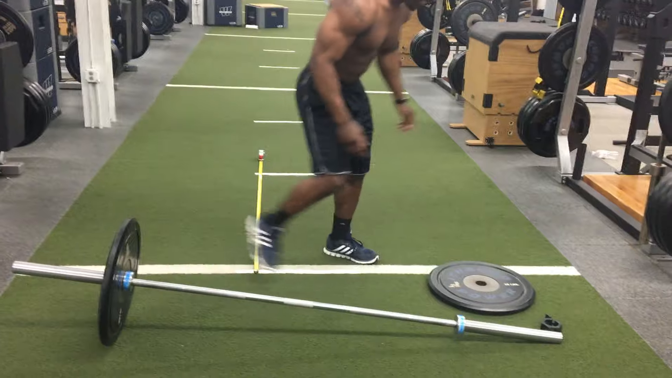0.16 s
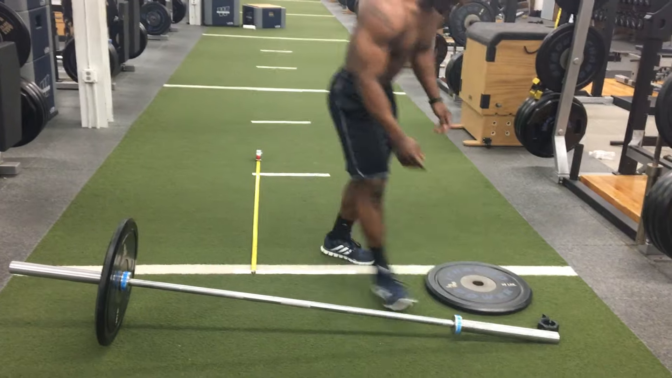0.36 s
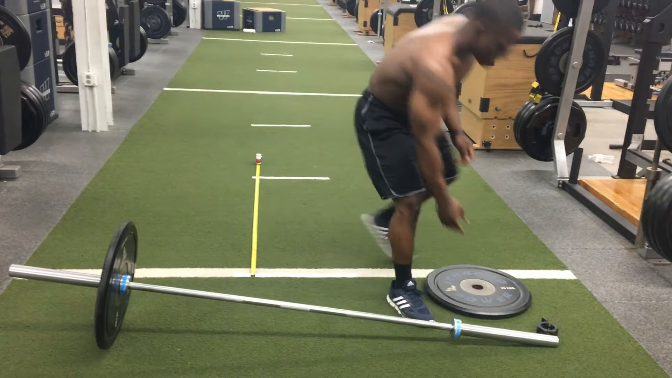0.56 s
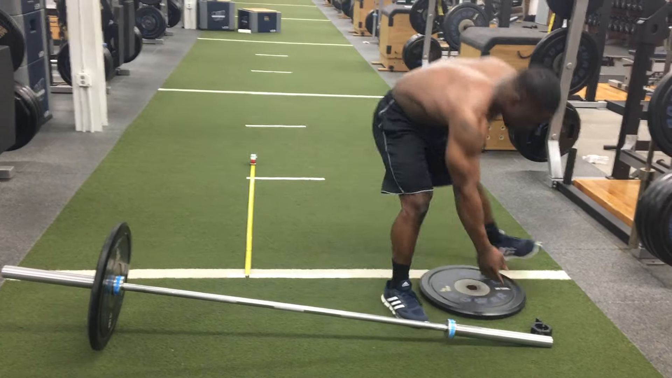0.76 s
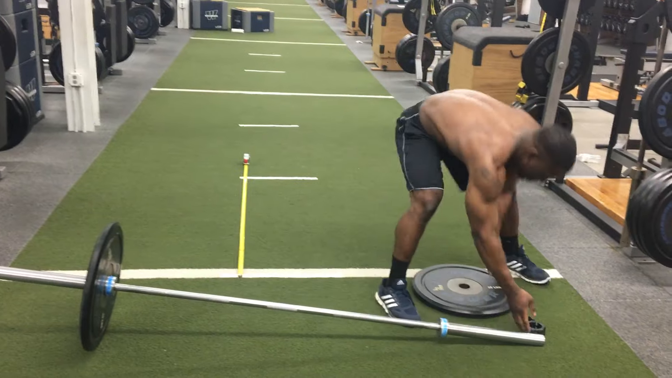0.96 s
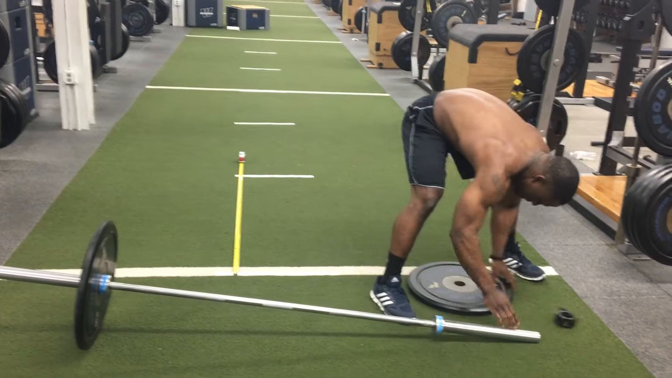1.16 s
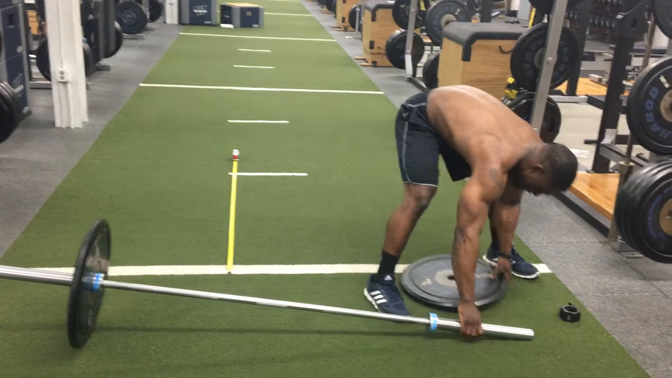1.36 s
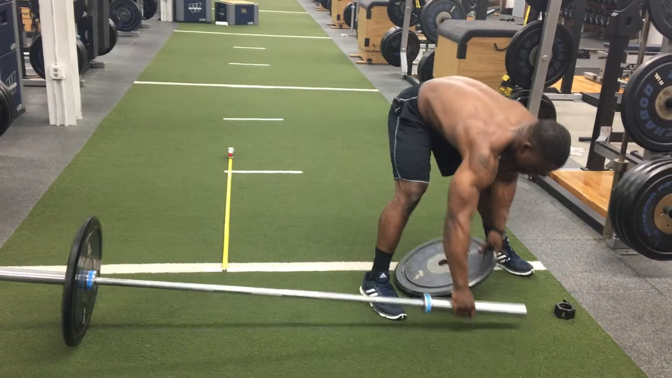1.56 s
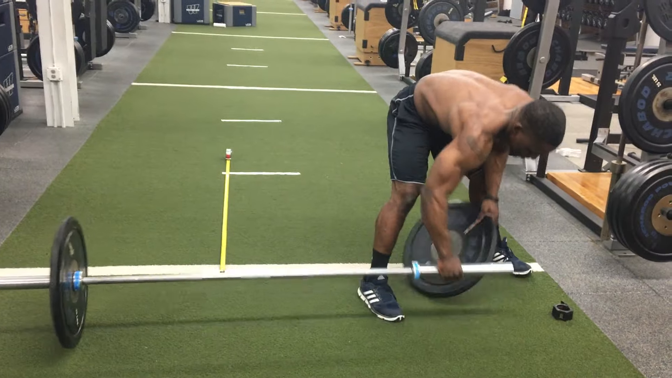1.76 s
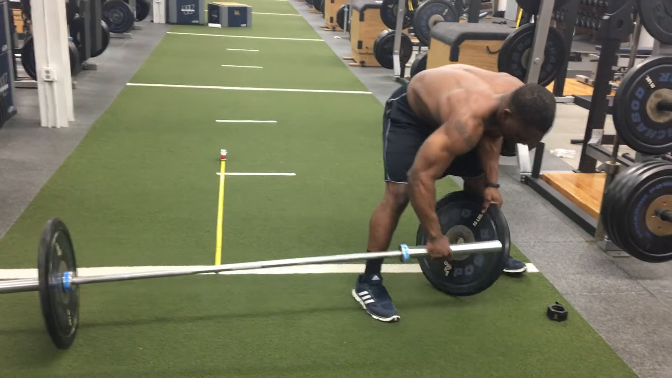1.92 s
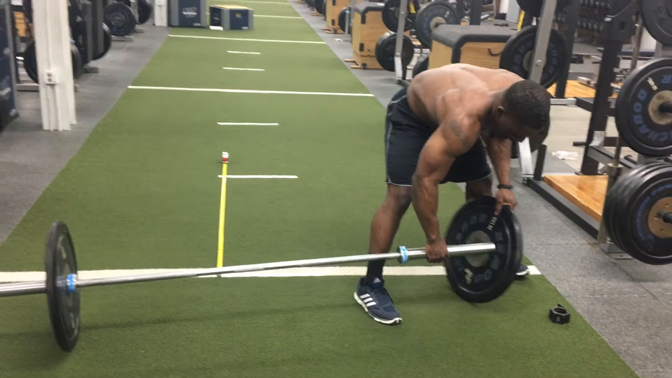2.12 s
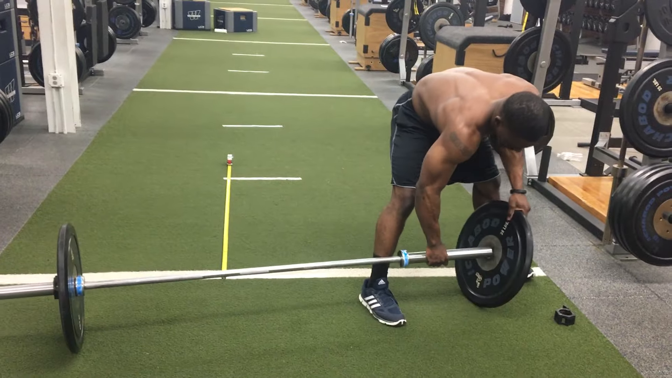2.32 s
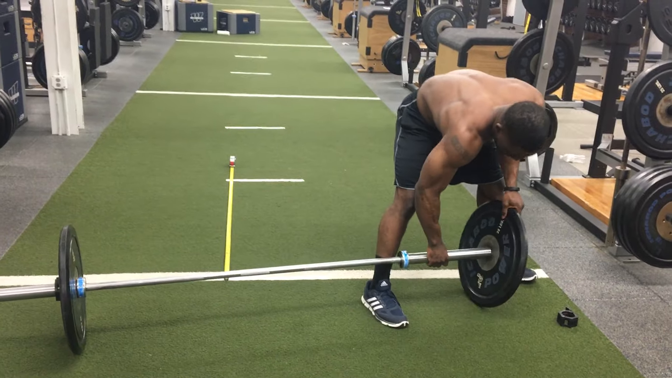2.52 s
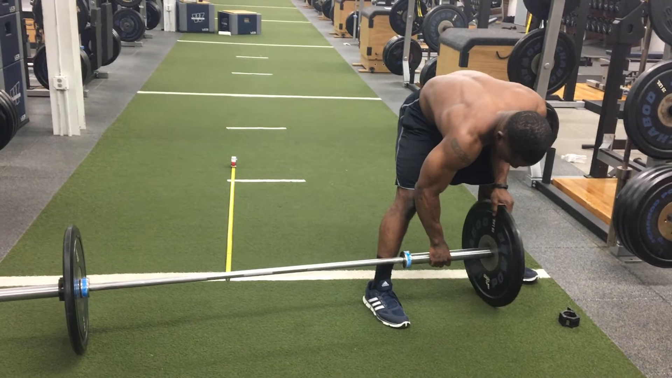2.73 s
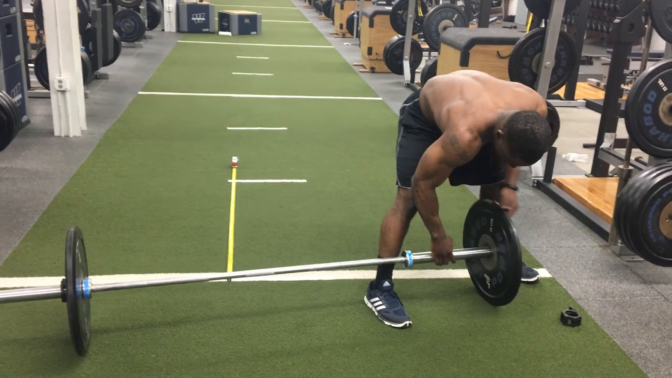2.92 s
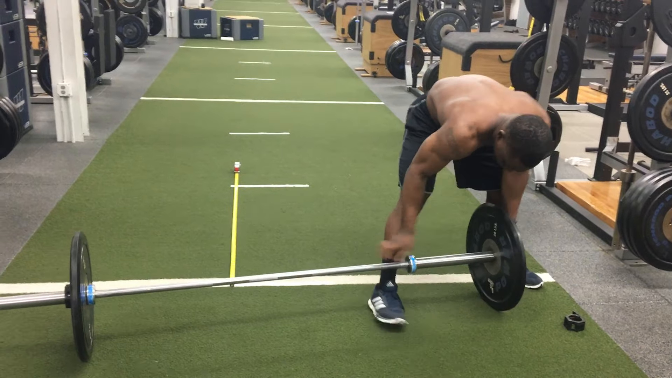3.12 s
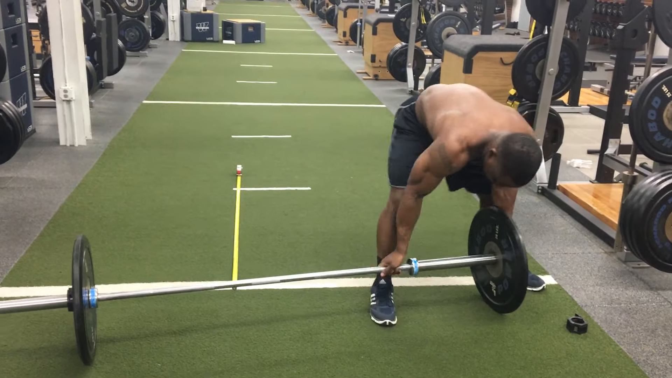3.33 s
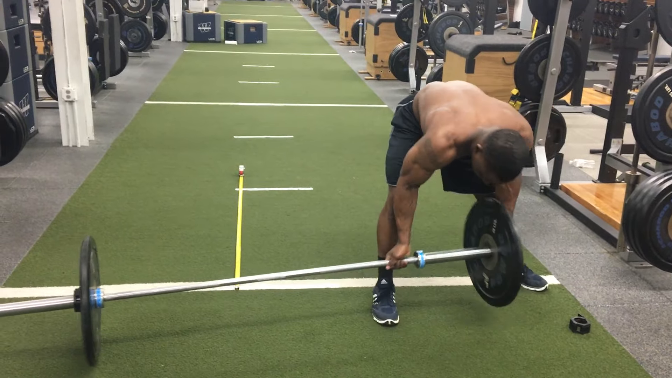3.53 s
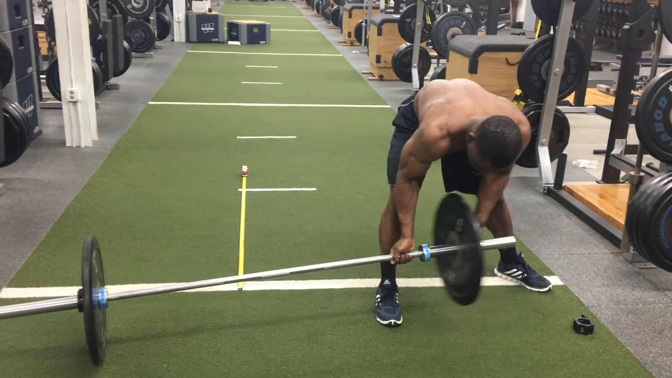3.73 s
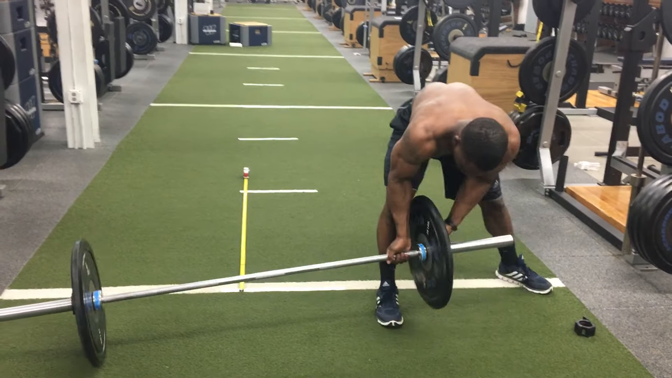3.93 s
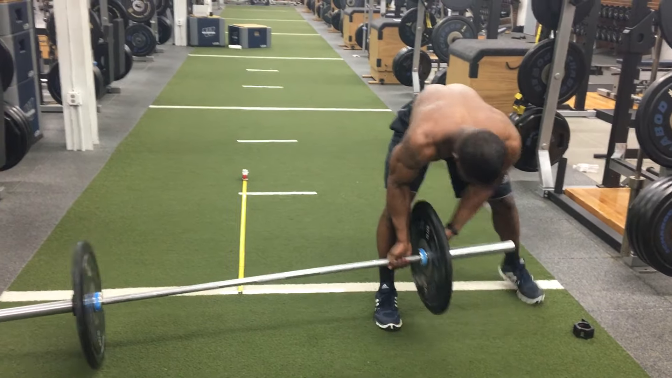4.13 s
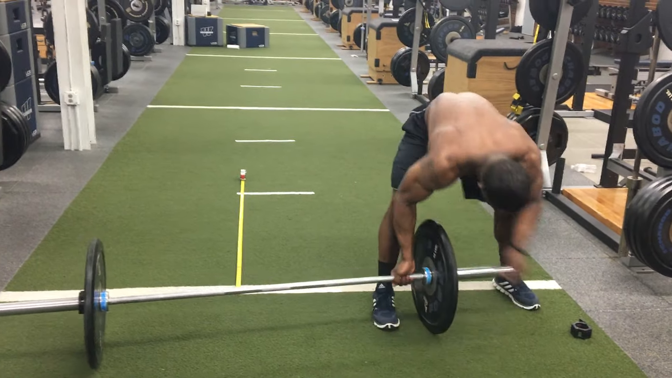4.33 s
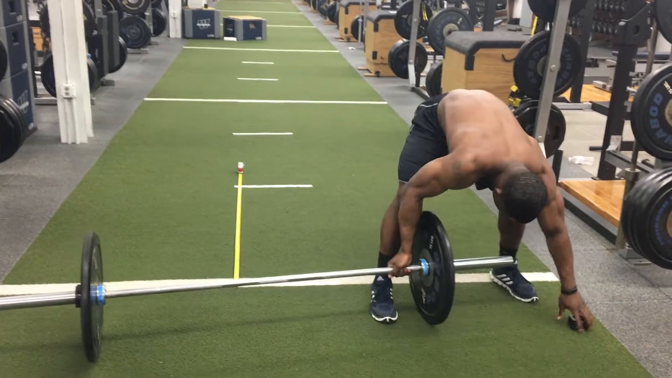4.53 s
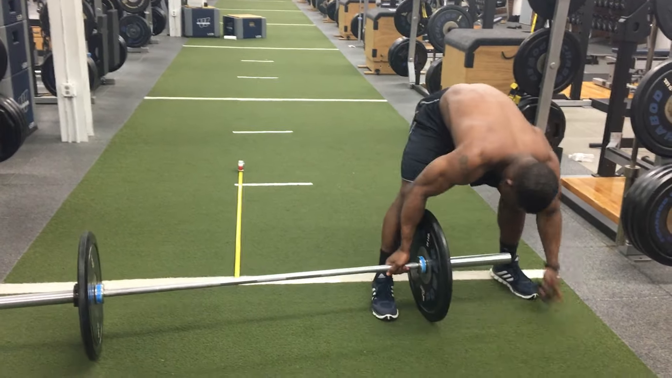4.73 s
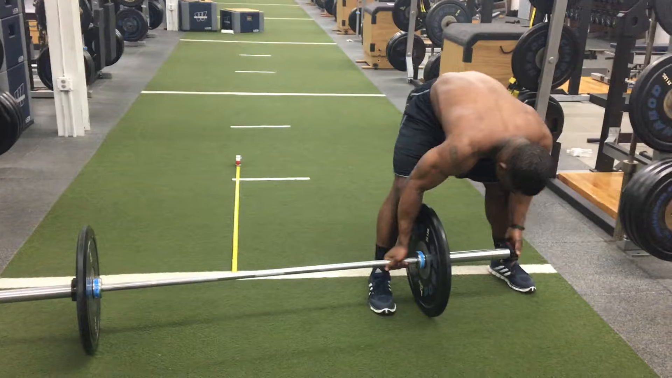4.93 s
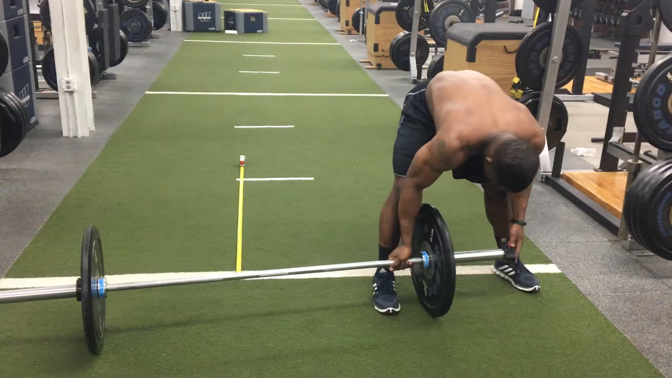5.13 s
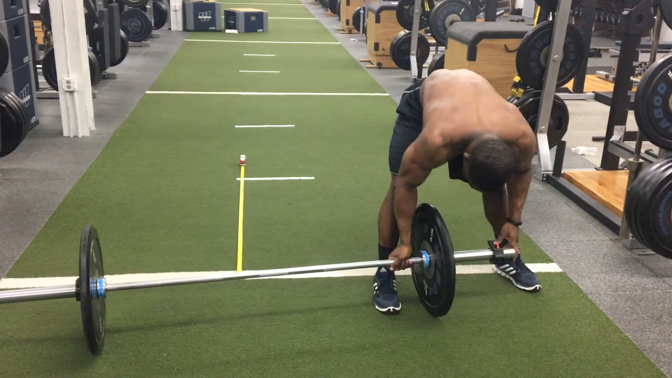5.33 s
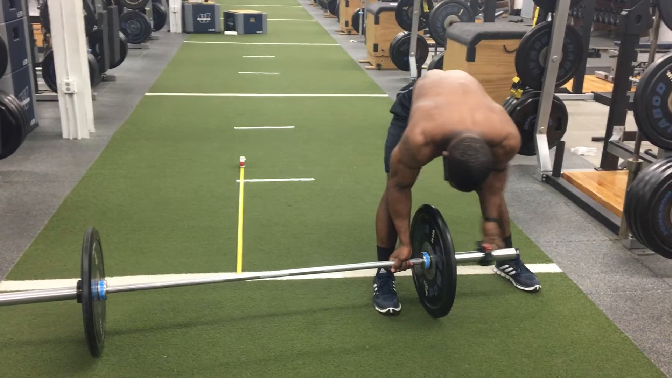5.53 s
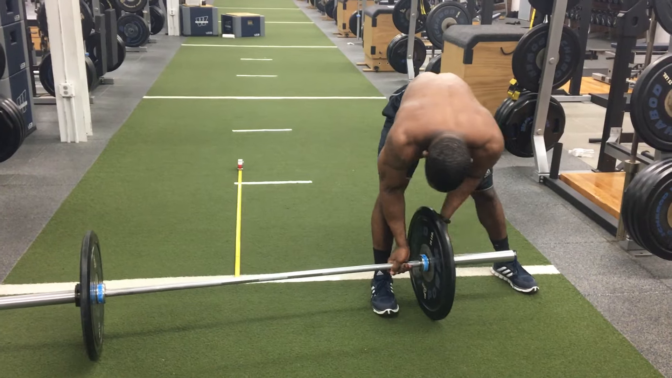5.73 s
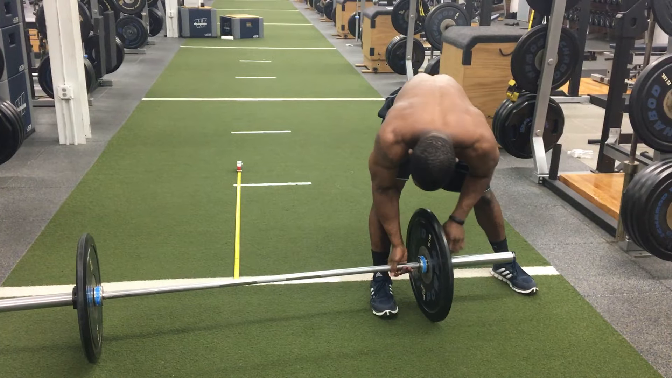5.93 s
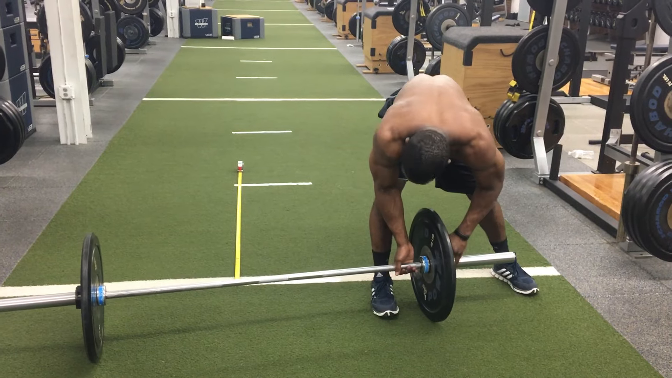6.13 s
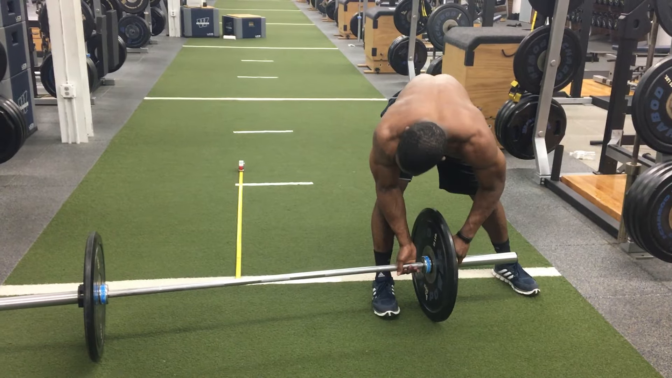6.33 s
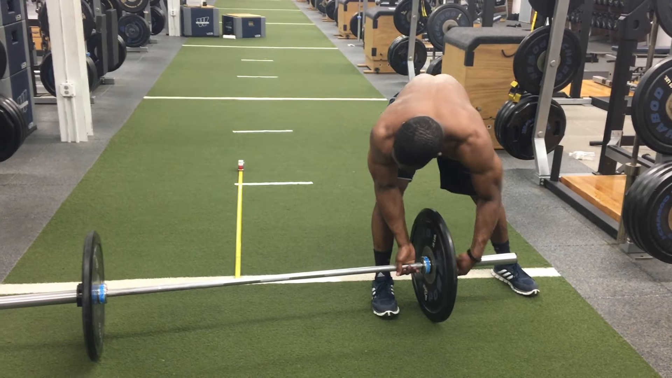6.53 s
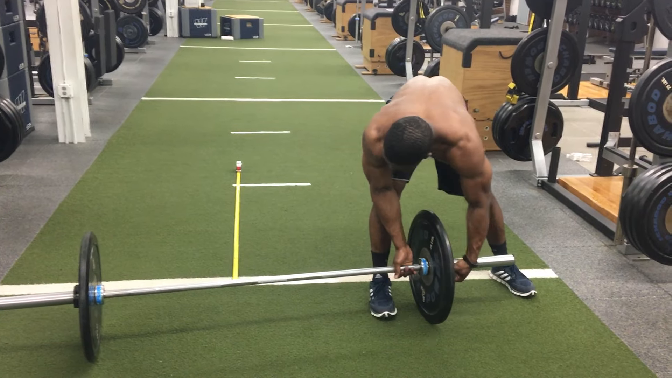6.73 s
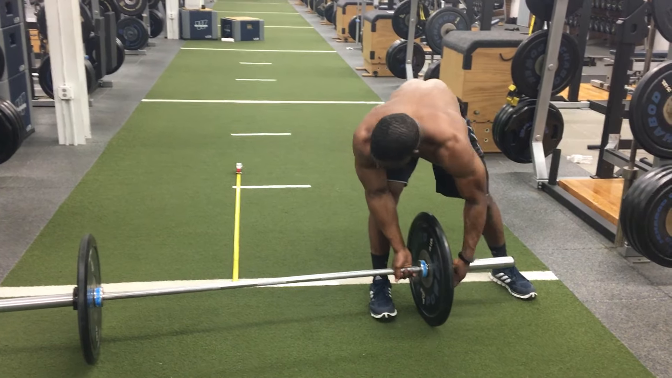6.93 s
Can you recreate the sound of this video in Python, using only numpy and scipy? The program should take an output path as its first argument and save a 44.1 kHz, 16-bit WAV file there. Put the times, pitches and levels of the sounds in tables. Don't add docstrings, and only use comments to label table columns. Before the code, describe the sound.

A steady low rush of ventilation with a faint electrical hum fills a large, hard gym hall. For the first two seconds there are only barely audible shoe ticks and grainy rustles on turf. At about 2.3 and 2.45 s a plate's hub knocks the steel sleeve tip: sharp clanks, brief ringing, dull rubber thump, with softer knocks from 2.75 to 2.95. A faint scuff comes at 3.2. At 3.54 the hub catches and scrapes, with small snags, a high chirp near 3.68 and a thin squeal, until the plate slams home at 3.95, by far the loudest hit, bouncing with a squeak at 4.04 and echoing through the hall. It rocks softly around 4.45. A plastic collar rattles from 5.0 to 5.4, whistles upward at 5.65 and snaps hard at 5.78. Faint ticks surround 6.0-6.2; a dry double lever click ends it at 6.86. Phone microphone, slightly overloaded at the slam.

```python
import sys
import numpy as np
from scipy import signal
from scipy.fft import rfft, irfft, next_fast_len
from scipy.io import wavfile
from scipy.ndimage import uniform_filter1d

SR = 44100
rng = np.random.default_rng(int(sys.argv[2]) if len(sys.argv) > 2 else 0)


def unload_audio(sound):
    columns = np.transpose(np.atleast_2d(sound))
    steps = np.round(np.clip(columns, -1, 1) * 32767)
    wavfile.write(sys.argv[1], SR, steps.astype(np.int16))


def boost(x):
    u = np.asarray(x, float) / 20
    return 10 ** u


N = 311434

# mode_hz [Hz], level_db [dB], t60_s [s to fall 60 dB]
TIP_MODES = [(1297, -10, .2), (1976, -6, .25), (2471, -7, .3), (2724, -5, .3), (2907, 0, .35),
             (3537, -7, .25), (3908, -6, .16), (4350, -6, .16), (5200, 0, .4), (5642, -8, .12),
             (6115, -7, .18), (6589, -5, .16), (7106, -8, .2), (7617, -6, .22), (8145, -9, .15),
             (8646, -8, .12), (9932, -12, .2), (12040, -12, .13), (13060, -10, .13)]
# mode_hz [Hz], level_db [dB], t60_s [s]
SHOULDER_MODES = [(950, -6, 0.07), (1328, 3.5, 0.1), (1697, 0.5, .12), (1885, -12, .12), (2017, -14, 0.16),
                  (2223, -11.5, 0.33), (2420, -23, .2), (2890, 3, 0.14), (3050, 1, .3), (3570, -11, 0.13),
                  (4290, -4, 0.14), (5280, -3.5, 0.23), (6140, -3.5, 0.21), (6627, -9, 0.1),
                  (7720, 5, 0.13), (7300, -5, 0.1), (8600, -5, 0.09), (10130, -3, 0.1), (11900, -10, .1),
                  (13100, -10, .1), (14090, -12, .1), (15300, -16, .08)]
# mode_hz [Hz], level_db [dB], t60_s [s]
RUBBER_MODES = [(110, -15, .09), (168, -5, .13), (200, 1, .18), (240, 0, .15), (270, -4, .1),
                (339, -4, .08), (418, -5, .07), (452, -8, .06), (560, -5, .05), (650, -4, .05),
                (950, -10, .04)]

TIP_BLOW = dict(thud_db=-32.5, thud_per_db=.47, thud_per_octave=-4,
                contact_ms=.8, softer_ms=.27, contact_max_ms=4.5)
SHOULDER_BLOW = dict(thud_db=-36.5, thud_per_db=.99, thud_per_octave=-.82,
                     contact_ms=4.3, softer_ms=.03, contact_max_ms=5.5)


def evened(x):
    return x / np.sqrt(np.mean(x ** 2) + 1e-20)


def read(points, hz):
    f, value = np.transpose(points)
    return np.interp(np.log(hz + 1), np.log(f + 1), value)


def add(mix, s, sound):
    part = mix[round(s * SR):][:len(sound)]
    part += sound[:len(part)]


def band(x, edges_hz):
    return signal.sosfilt(signal.butter(2, edges_hz, "band", fs=SR, output="sos"), x)


def wander(rate_hz):
    size = next_fast_len(N)
    hz = np.fft.rfftfreq(size, 1 / SR)
    drift = irfft(rfft(rng.standard_normal(size)) / (1 + (hz / rate_hz) ** 4), size)
    return evened(drift[:N])


def crack(db, hz, ms, below, above):
    size, kept = 4096, 1500
    f = np.fft.rfftfreq(size, 1 / SR)
    octaves = np.log2((f + 50) / hz)
    width = np.where(octaves < 0, below, above)
    colour = 1 / (1 + (octaves / width) ** 2) ** 2
    a, b = uniform_filter1d(rng.standard_normal((2, len(f))), size=14, axis=1)
    late_s = (evened(a) ** 2 + evened(b) ** 2) * max(ms, .2) / 2500
    phase = 2 * np.pi * np.cumsum(late_s + 0.000273) * f[1]
    burst = irfft(colour * np.exp(-1j * phase))[:kept]
    burst *= np.minimum(np.arange(kept) / 12, 1) * np.hanning(2 * kept)[kept:]
    return boost(db + 20.5) * burst / np.linalg.norm(burst)


def ring(modes, db, reach_hz, rise_ms, longest, split):
    t = np.arange(SR // 4) / SR
    hz, mode_db, t60 = np.transpose(modes)[:, :, None]
    phase, twin, third, share = rng.random((4, len(modes), 1))
    cluster = np.sin(2 * np.pi * (hz * t + phase))
    cluster = cluster + 1.1 * np.sin(2 * np.pi * (hz * (1 + split) * t + twin))
    cluster = cluster + 0.65 * np.sin(2 * np.pi * (hz * (1 - split * (0.26 + third)) * t + third + twin))
    t60 = np.clip(t60, .005, longest * (3000 / hz) ** .25)
    tones = boost(mode_db + 5 * (share - .5) - 60 * t / t60) * cluster
    reached = tones / (1 + (hz / reach_hz) ** 2)
    rise = np.minimum(t * 1000 / rise_ms, 1)
    return boost(db) * reached.sum(0) / np.linalg.norm(boost(mode_db)) * rise


def plate(rows, steel, longest, below, above, thud_db, thud_per_db, thud_per_octave,
          contact_ms, softer_ms, contact_max_ms):
    out = np.zeros(N)
    for s, db, hz, ring_db in rows:
        ms = min(contact_ms - softer_ms * (db + 10), contact_max_ms)
        thump_db = thud_db + thud_per_db * (db + 20) + thud_per_octave * np.log2(hz / 1500)
        steel_reach_hz = 9000 * boost(.15 * (db + 15))
        rubber_reach_hz = 300 * boost(.5 * (db + 26))
        add(out, s, crack(db - 7.5, hz, ms, below, above))
        add(out, s, ring(steel, ring_db, steel_reach_hz, rise_ms=.8, longest=longest, split=.018))
        add(out, s, ring(RUBBER_MODES, thump_db + 3, rubber_reach_hz, rise_ms=2.7, longest=.25, split=.056))
    return out


def hub_knocks_tip():
    # [steel ring, dB]
    knocks = [(2.2893, -12, 1250, -46), (2.2925, -35, 1110, -64), (2.332, -52, 1000, -65),
              (2.4425, -12, 1260, -31.5), (2.4525, -12.5, 2320, -36.5), (2.747, -18.5, 826, -53),
              (2.752, -23.5, 1260, -48), (2.792, -22.5, 2600, -45), (2.838, -23, 3400, -40),
              (2.889, -22.5, 2010, -47), (2.927, -25, 2800, -62)]
    return plate(knocks, TIP_MODES, longest=.4, below=.8, above=.8, **TIP_BLOW)


def hub_snags():
    # [steel ring, dB]
    snag_blows = [
        (3.542, -20.5, 3160, -30.5),
        (3.589, -25, 2770, -59),
        (3.635, -28.5, 3500, -53),
        (3.677, -36, 5420, -46),
        (3.838, -32.5, 2060, -54),
    ]
    return plate(snag_blows, SHOULDER_MODES, longest=.12, below=1.1, above=.95, **SHOULDER_BLOW)


def plate_slams():
    # [steel ring, dB]
    slams = [
        (3.952, -1, 1324, -17),
        (3.955, -6, 3200, -20.5),
        (4.041, -8.5, 2680, -26.5),
    ]
    return plate(slams, SHOULDER_MODES, longest=.3, below=1.1, above=.95, **SHOULDER_BLOW)


def plate_settles():
    # [steel ring, dB]
    rocks = [
        (4.428, -17.5, 1900, -39),
        (4.49, -20, 2400, -44),
    ]
    return plate(rocks, TIP_MODES, longest=.2, below=.8, above=1.1, **SHOULDER_BLOW)


def clicks(rows, ms, rebound_db=-2.5):
    out = np.zeros(N)
    for s, db, hz, fizz_db in rows:
        for late_s, loss_db in [(0, 0), (ms * 0.0013, rebound_db)]:
            body = crack(db - 11 + loss_db, hz, ms, below=3.5, above=.81)
            fizz = crack(fizz_db + loss_db, 11500, ms, below=1, above=.5)
            add(out, s + late_s, body + fizz)
    return out


def hub_edges():
    # [top fizz, dB]
    bites = [(2.2806, -41, 4730, -61), (2.2892, -19.5, 3280, -64), (2.332, -45, 7000, -62),
             (2.4424, -38, 6550, -59), (2.4523, -14.5, 4630, -60), (2.7714, -28, 3910, -58),
             (2.8247, -43, 3500, -58), (2.8444, -24.5, 4800, -64), (3.9519, -2, 4240, -21),
             (3.9564, -5.5, 4640, -28), (4.4444, -33, 5970, -61)]
    return clicks(bites, ms=2.1)


def scrape():
    start_s, end_s, level_db, fade_db = 3.53, 3.95, -42, -23
    t = np.arange(start_s, end_s, 1 / SR)
    strength = boost(3.6 * np.minimum(rng.exponential(1, N), 5))
    snags = strength * rng.standard_normal(N) * (rng.random(N) < 2500 / SR)
    dull = evened(band(snags, (400, 3500)))
    out = np.zeros(N)
    add(out, t[0], dull[:len(t)] * boost(level_db + fade_db * (t - t[0]) / (t[-1] - t[0])))
    return out


def chirps():
    # [second
    # partial, dB]
    slips = [
        (3.5302, -33.5, 1790, 6, 18.5),
        (3.681, -22, 5470, 9.4, -25),
        (3.949, -37, 3020, 4.2, -38),
        (4.043, -15.5, 3005, 7.9, -29),
        (4.044, -18, 1880, 4, -40),
    ]
    out = np.zeros(N)
    for s, db, hz, ms, second_db in slips:
        third_db = second_db - 10
        t = np.arange(-800, 800) / SR
        shake = evened(uniform_filter1d(rng.standard_normal(len(t)), size=40))
        turns = np.cumsum(hz * (1 - 2.5 * t + .024 * shake)) / SR
        levels = [0, second_db, third_db, third_db - 16, third_db - 22, third_db - 33]
        stack = np.zeros(len(t))
        for k, level in enumerate(levels, 1):
            if k * hz < SR / 2:
                stack += boost(level) * np.sin(2 * np.pi * k * turns)
        add(out, s + t[0], boost(db) * stack * np.exp(-2 * (t * 1000 / ms) ** 2))
    return out


def glide(rows, flutter_db, jitter):
    s, *columns = np.transpose(rows)
    t = np.arange(N) / SR
    hz, db, *second_db = (np.interp(t, s, c) for c in columns)
    turns = np.cumsum(hz * (1 + jitter * wander(262))) / SR
    tone = np.sin(2 * np.pi * turns)
    for octave_db in second_db:
        tone = tone + boost(octave_db) * np.sin(4 * np.pi * turns) * (hz < SR / 5)
    gate = np.interp(t, [s[0], s[0] + .01, s[-1] - .01, s[-1]], [0, 1, 1, 0])
    return np.sqrt(2) * boost(db + flutter_db * wander(87)) * tone * gate


def squeals():
    # start_s [s], length_s [s], level_db [dB], first_hz [Hz], last_hz [Hz]
    sung = [(3.645, .045, -50, 5240, 5380), (3.685, .265, -43, 5430, 5380), (3.69, .04, -63, 9650, 9750),
            (3.755, .11, -61, 9650, 10050), (3.87, .03, -63, 10250, 10400), (3.685, .05, -60, 14400, 14100),
            (3.775, .045, -64, 14400, 14450), (3.695, .03, -56, 13400, 13350),
            (3.63, .04, -66, 12600, 12400)]
    swell = .2
    out = np.zeros(N)
    for s, length, db, first_hz, last_hz in sung:
        top_hz = first_hz + swell * (last_hz - first_hz)
        curve = [(s, first_hz, db - 3), (s + swell * length, top_hz, db), (s + length, last_hz, db - 18)]
        out += glide(curve, flutter_db=4.5, jitter=.006)
    return out


def collar_whistle():
    # [second partial, dB]
    whistle_curve = [(5.64, 6060, -68, -5), (5.66, 6500, -64, -6), (5.685, 6000, -74, -2),
                     (5.70, 6840, -70, -17), (5.73, 7700, -74, -12), (5.775, 9700, -58, -20)]
    return glide(whistle_curve, flutter_db=5.5, jitter=.016)


def collar():
    # start_s [s], level_db [dB], centre_hz [Hz], fizz_db [top fizz, dB]
    rattles = [(5.001, -28.5, 4600, -46), (5.0085, -21.5, 5680, -49), (5.0575, -28.5, 3000, -53.5),
               (5.2282, -31.5, 5000, -43.5), (5.2734, -28.5, 6030, -59), (5.3335, -32.5, 5360, -67),
               (5.4241, -36, 5500, -70), (5.6371, -42, 7400, -71)]
    home_snaps = [
        (5.777, -17, 6030, -34),
        (5.7812, -13.5, 7040, -35),
        (5.785, -8, 7000, -39),
        (5.7885, -7.5, 5770, -21),
    ]
    lever_clicks = [
        (6.8608, -20.5, 4530, -46),
        (6.864, -18, 5100, -45),
    ]
    # start_s [s], level_db [dB]
    thumps = [
        (5.782, -36),
    ]
    # mode_hz [Hz], level_db [dB], t60_s [s]
    lever_modes = [(2750, -2, .007), (4250, -4, .007), (6600, 0, .008), (8200, -8, .006),
                   (12300, -12, .006)]
    out = clicks(rattles, ms=3)
    out += clicks(home_snaps, ms=1.8, rebound_db=-11.5)
    out += clicks(lever_clicks, ms=1.27, rebound_db=-9)
    for s, db in thumps:
        add(out, s, ring(RUBBER_MODES, db, 5000, rise_ms=.66, longest=.15, split=.043))
    for s, db, *_ in lever_clicks:
        add(out, s, ring(lever_modes, db - 8, 20000, rise_ms=.6, longest=.03, split=.07))
    return out


def body_ticks():
    # start_s [s], level_db [dB]
    tick_times = [(.4794, -45), (0.62, -46), (1.2794, -52), (1.4394, -46), (3.3098, -41), (4.813, -51),
                  (5.1894, -56), (5.9974, -37), (6.1708, -34), (6.1844, -41), (6.6124, -54)]
    return clicks([(s, db, 3800, db - 17.5) for s, db in tick_times], ms=2.6)


def rustle():
    # [over the rustle, dB]
    scuffs = [
        (.47, .06, 9),
        (3.2, 0.16, 7),
    ]
    # start_s [s], length_s [s]
    lulls = [(.35, .12), (1.3, 0.23), (2.34, .1), (2.51, 0.16), (5.08, .12), (5.35, .38), (6.22, 0.23)]
    t = np.arange(N) / SR
    moves_db = np.zeros(N)
    for s, length, db in scuffs + [(s, length, -34) for s, length in lulls]:
        moves_db += db * np.clip(np.minimum(t - s, s + length - t) / .03, 0, 1)
    grains = rng.standard_normal(N) * boost(1.3 * wander(330) + .64 * wander(3.7))
    return boost(-71 + moves_db) * evened(band(grains, [5000, 15000]))


def hall(x, tail_db):
    # pitch_hz [Hz], t60_s [s]
    hall_decay = [(100, 1.4), (250, 2.54), (600, 1.98), (1500, 1.7), (3000, 1.13), (6000, 0.67),
                  (12000, 0.38)]
    # delay_ms [ms], level_db [dB]
    wall_echoes = [(5, -20), (11, -18), (20, -25), (43, -17), (64, -19)]
    taps = np.zeros(2 * SR)
    start = np.arange(300, 2 * SR - 20, 20)
    taps[start + rng.integers(0, 20, len(start))] = rng.choice([-1., 1.], len(start))
    hz, t, z = signal.stft(taps, SR, nperseg=512)
    fade = boost(-60 * t / read(hall_decay, hz)[:, None])
    tail = signal.istft(z * fade, SR, nperseg=512)[1]
    tail *= boost(tail_db) / np.linalg.norm(tail)
    for ms, db in wall_echoes:
        add(tail, ms / 1000, crack(db - 21.5, 1350, 6, below=9.4, above=2.24))
    return signal.fftconvolve(x, tail)[:N]


def ventilation():
    # pitch_hz [Hz], level_db [dB per Hz]
    air_colour = [(30, -26), (45, -18.5), (90, -6.5), (200, -19.5), (250, -16), (430, -20.5), (700, -18),
                  (1500, -20), (2500, -24), (4100, -31), (7000, -40.5), (10500, -51), (15000, -55),
                  (16400, -71)]
    # pitch_hz [Hz], level_db [dB rms]
    hum_tones = [(46.5, -52), (120, -45), (165, -68), (241, -55.5), (286, -64), (328, -65.5)]
    # pitch_hz [Hz], level_db [dB rms]
    electric_tone = [(15229, -93)]
    frames, hz = N // 512 + 6, np.fft.rfftfreq(2048, 1 / SR)
    a, b, patches = rng.standard_normal((frames, 1025, 3)).T
    patches = evened(uniform_filter1d(uniform_filter1d(patches, 20, 0), 8, 1))
    level = boost(read(air_colour, hz)[:, None] + 1.16 * patches)
    air = signal.istft((a + 1j * b) * level, nperseg=2048, noverlap=1536)[1][:N]
    t = np.arange(N) / SR
    hum = np.zeros(N)
    for f, db in hum_tones + electric_tone:
        hum += boost(db + .24 * wander(3.4)) * np.sin(2 * np.pi * f * t + .5 * wander(4.2))
    return boost(-46) * evened(air) + np.sqrt(2) * hum


def scene():
    blows = hub_knocks_tip() + hub_snags() + plate_slams() + plate_settles()
    blows += hub_edges() + scrape() + collar() + body_ticks()
    squeaks = chirps() + squeals() + collar_whistle()
    echoing = hall(blows + boost(-7.5) * squeaks, tail_db=-8)
    return (blows + squeaks + echoing + ventilation() + rustle())[None]


def band_limit(x):
    return signal.sosfilt(signal.butter(12, 16600, fs=SR, output="sos"), x)


def record(dry):
    cut = signal.sosfilt(signal.butter(4, 40, "high", fs=SR, output="sos"), dry)
    overloaded = 0.84 * np.tanh(cut / 0.92)
    edge = signal.sosfilt(signal.cheby1(14, 1, 15750, fs=SR, output="sos"), overloaded)
    return band_limit(edge)


dry = scene()
out = record(dry)
unload_audio(out)
```